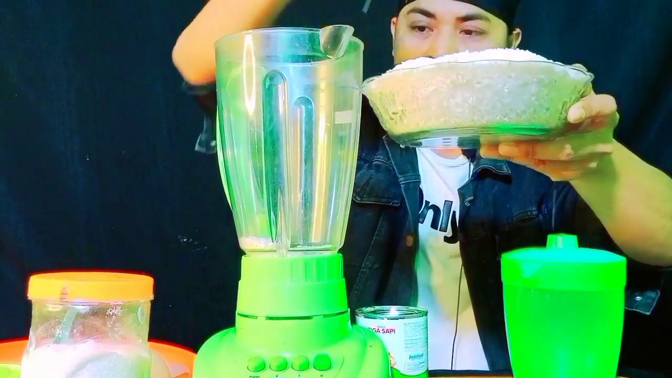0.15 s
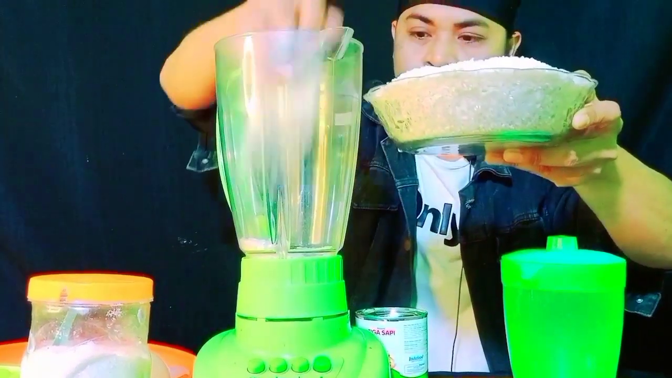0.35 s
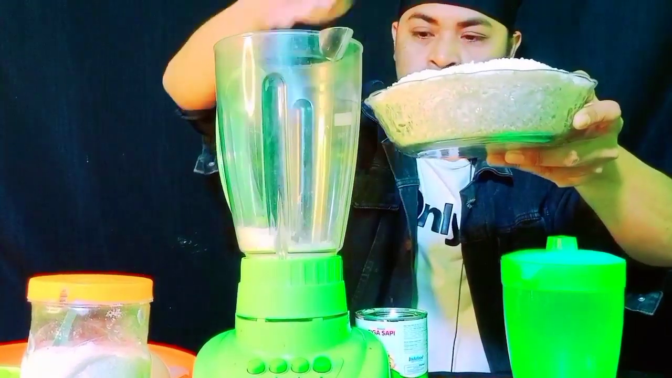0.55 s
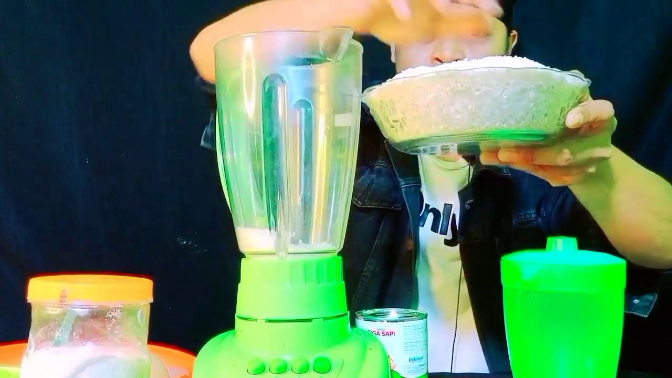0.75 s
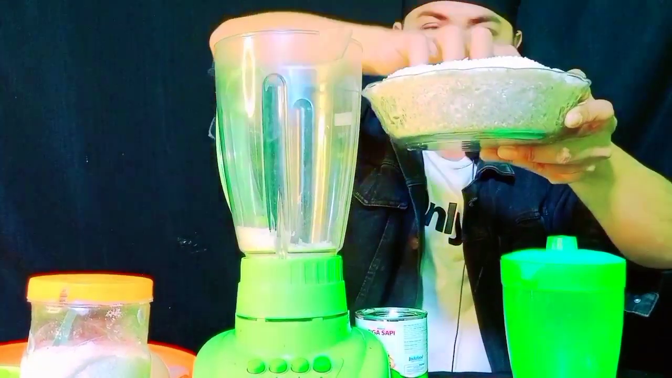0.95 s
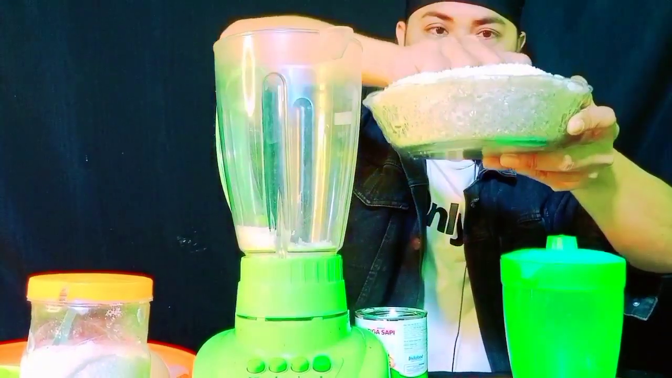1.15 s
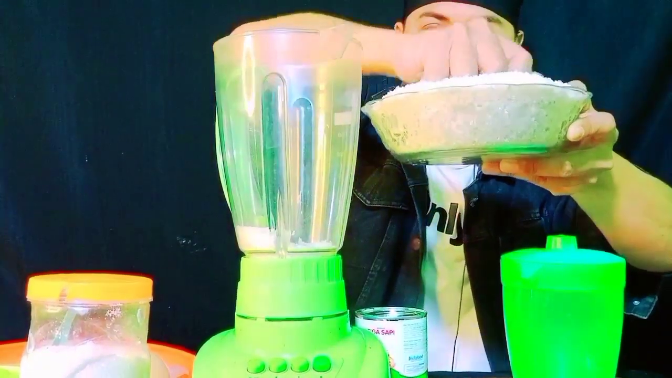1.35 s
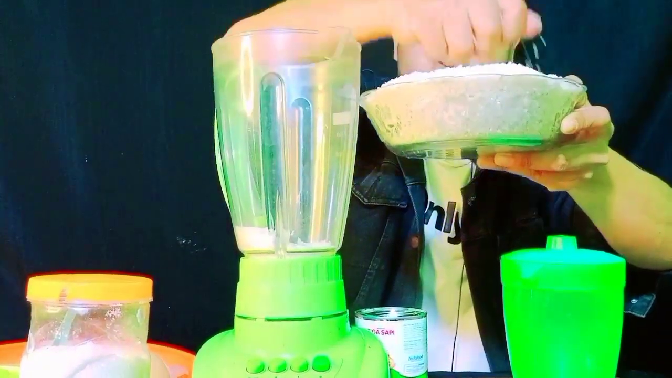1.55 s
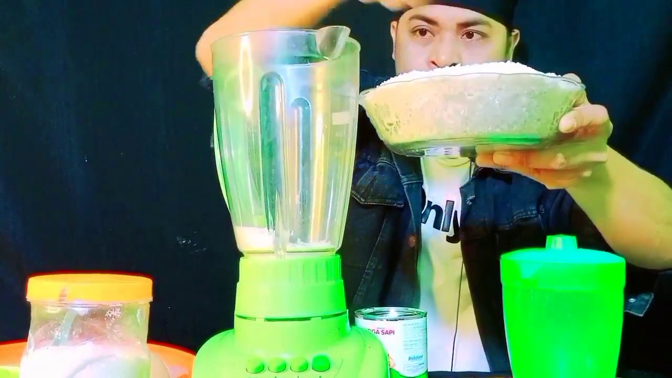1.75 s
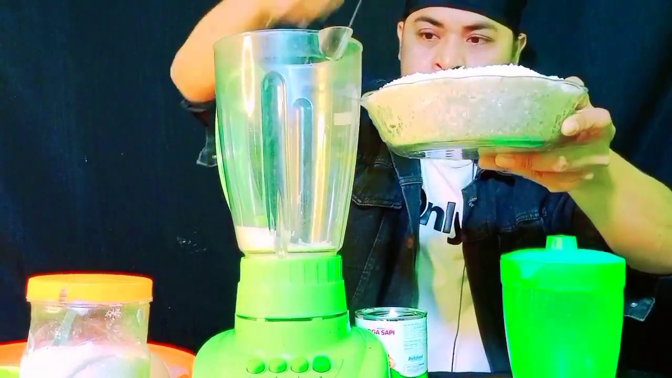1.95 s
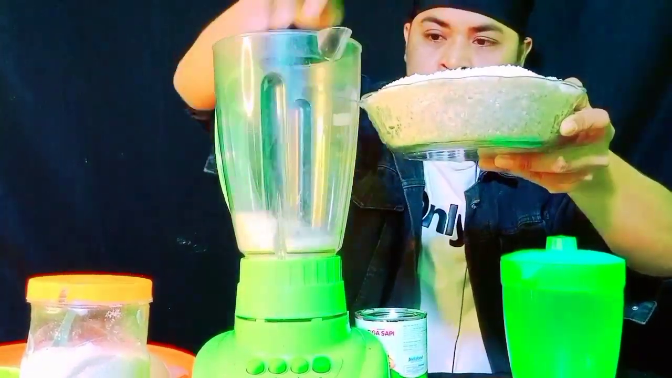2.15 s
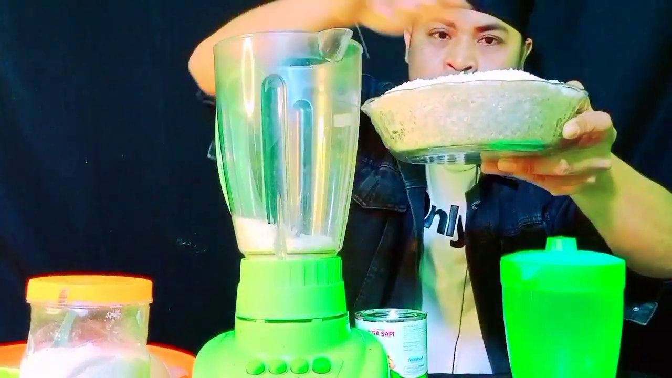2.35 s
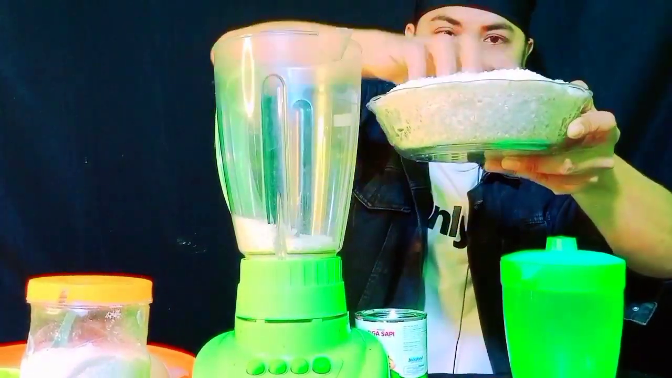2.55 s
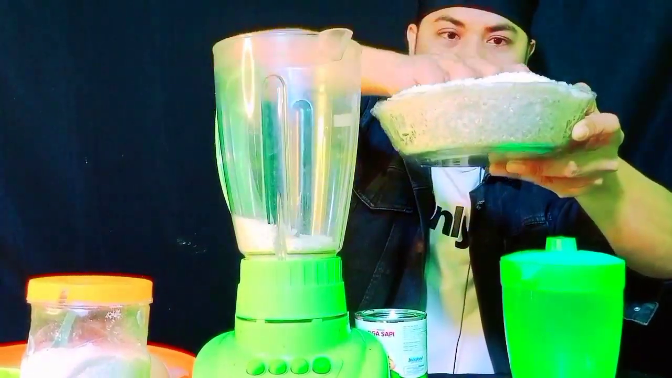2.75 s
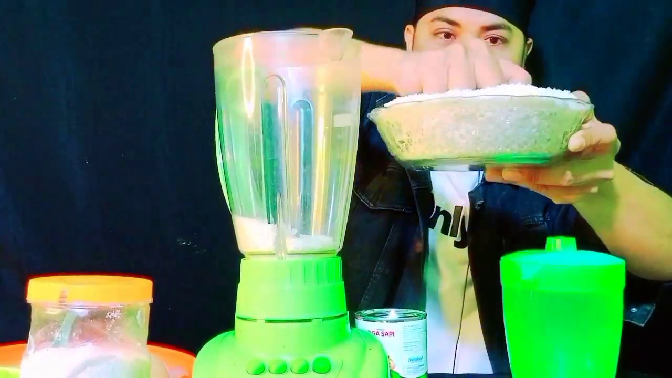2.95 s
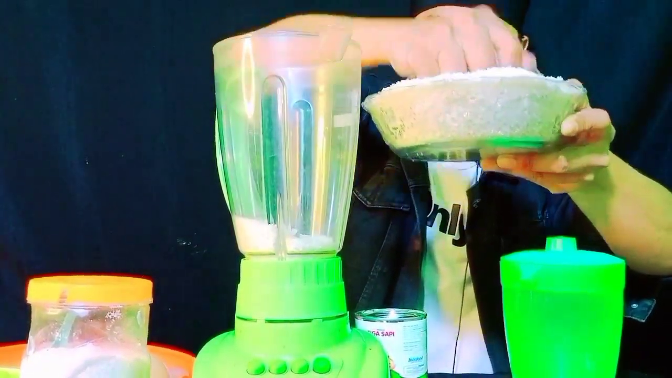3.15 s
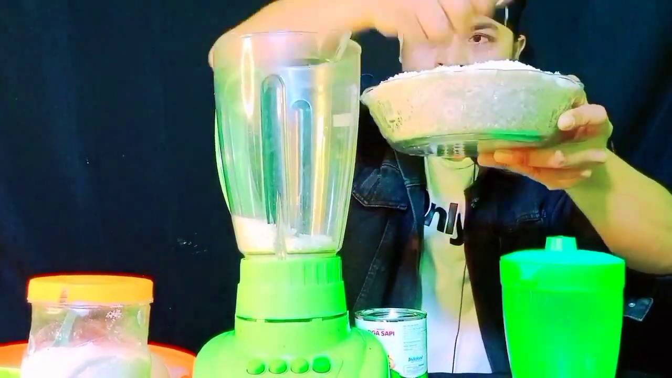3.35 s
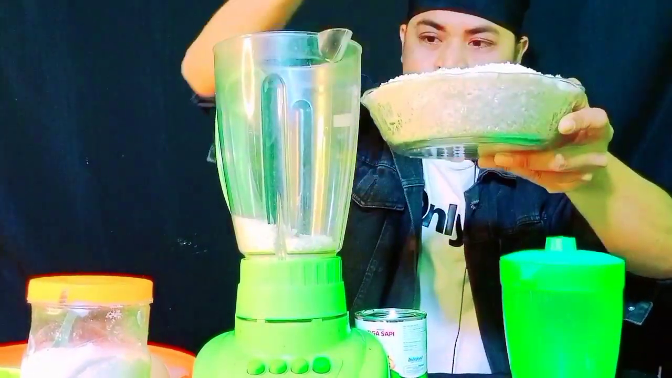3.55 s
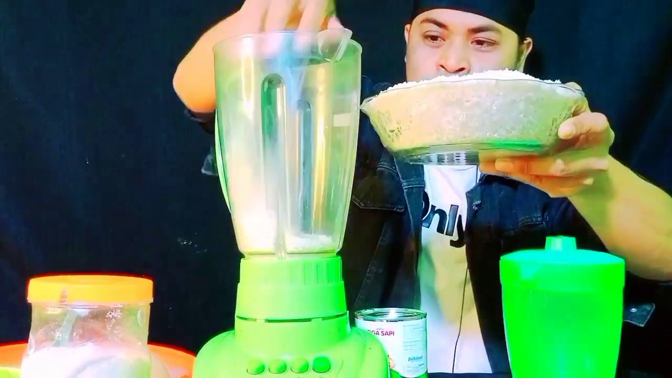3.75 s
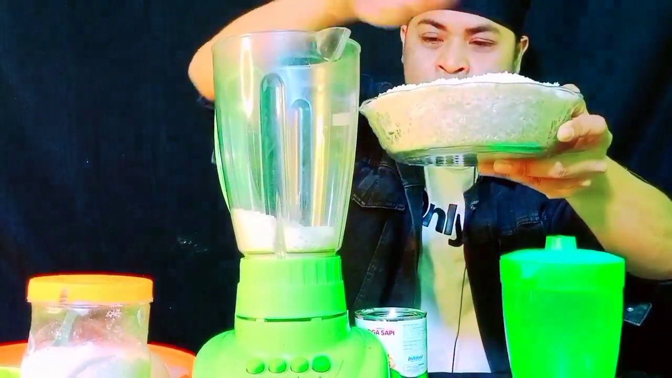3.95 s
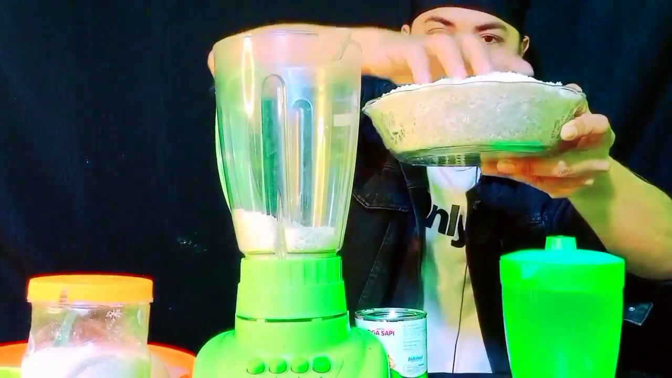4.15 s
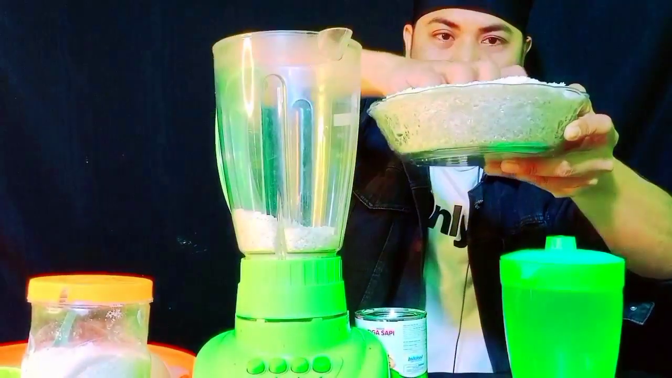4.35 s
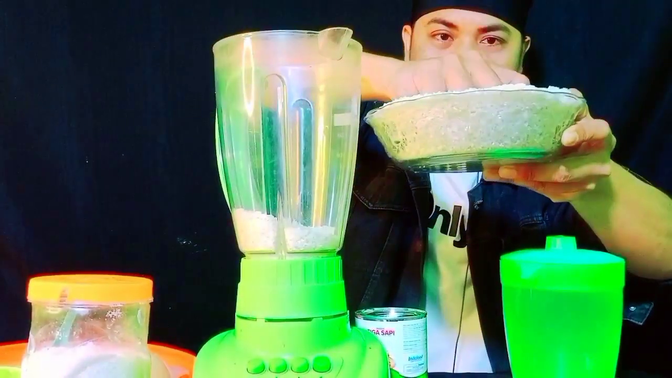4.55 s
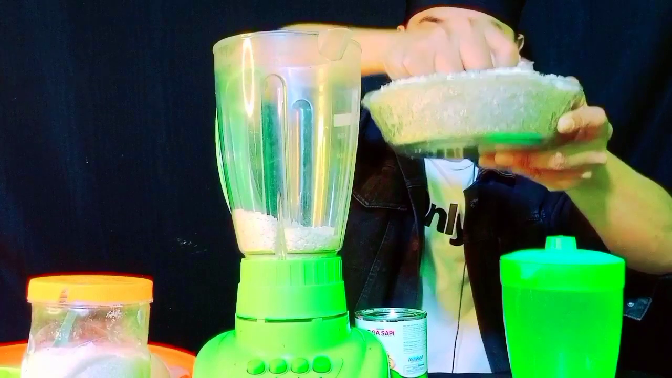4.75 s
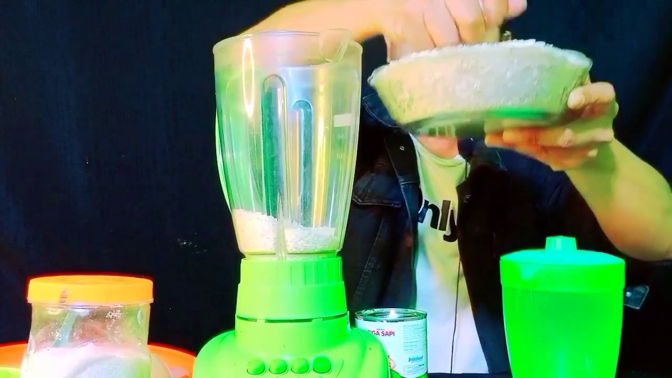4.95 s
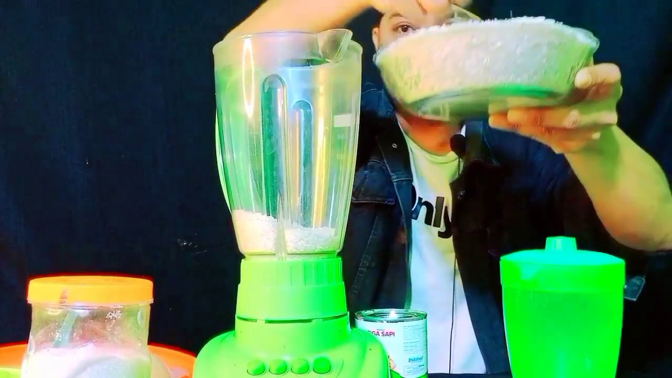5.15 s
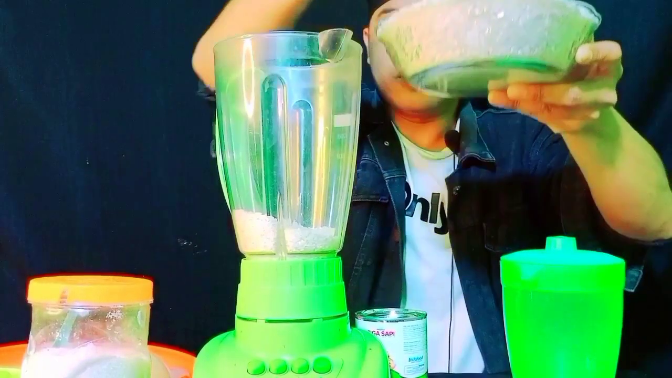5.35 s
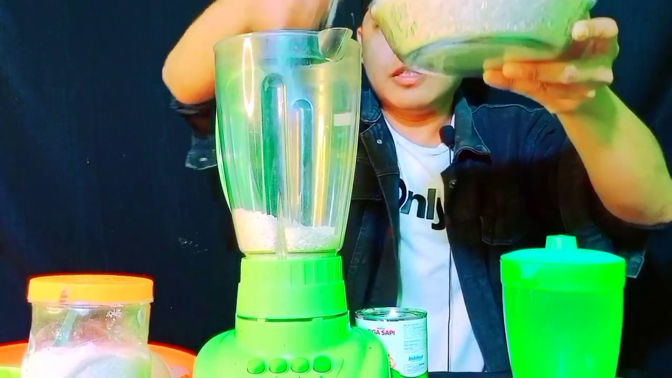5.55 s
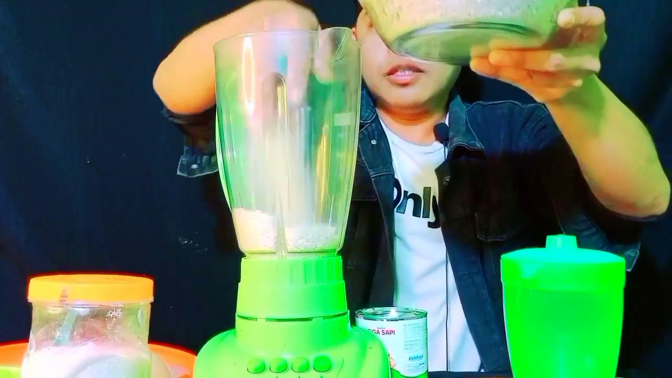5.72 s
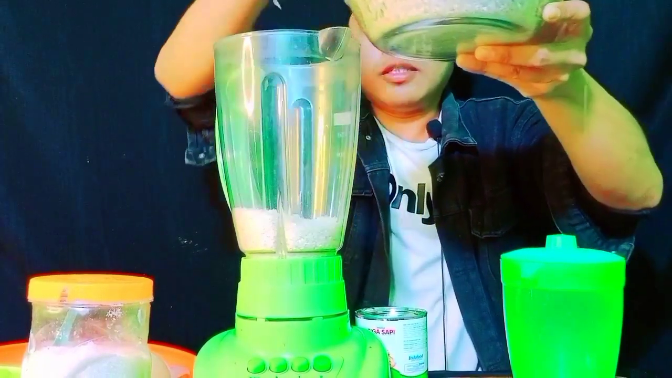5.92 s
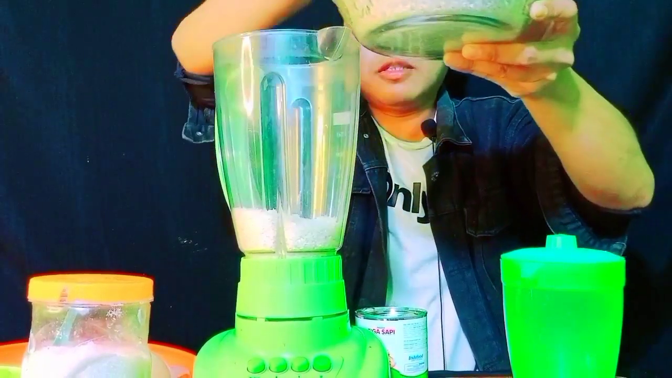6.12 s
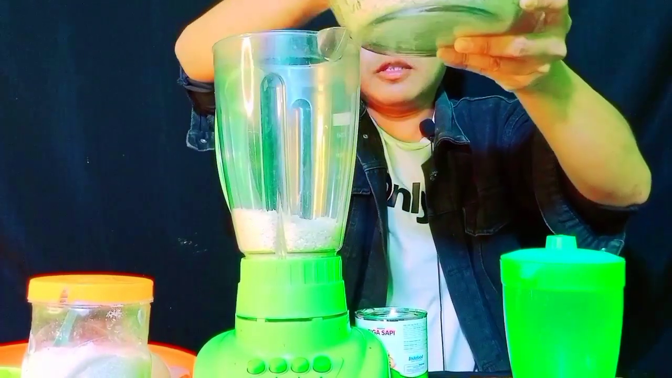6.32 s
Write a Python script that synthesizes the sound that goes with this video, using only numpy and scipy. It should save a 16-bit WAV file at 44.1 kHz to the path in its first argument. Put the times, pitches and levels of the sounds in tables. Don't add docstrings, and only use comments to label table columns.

```python
import sys
import numpy as np
from scipy import signal
from scipy.fft import rfft, irfft, next_fast_len
from scipy.io import wavfile
from scipy.ndimage import uniform_filter1d

SR = 44100
rng = np.random.default_rng(int(sys.argv[2]) if len(sys.argv) > 2 else 0)


def gain_from_decibels(decibels):
    exponent = np.asarray(decibels, float) / 20
    return 10 ** exponent


def wav_record(signal):
    frames = np.transpose(np.atleast_2d(signal))
    bounded = np.clip(frames, -1, 1)
    quanta = np.round(bounded * 32767).astype(np.int16)
    wavfile.write(sys.argv[1], SR, quanta)


N = 285889

# frequency [Hz], t60 [s].
ROOM_T60 = [(150, 0.91), (500, 0.51), (2000, 0.5), (5000, 0.52), (12000, 0.38), (15500, 0.35)]
TAIL = int(.6 * SR)

# frequency [Hz], level [dB per Hz].
HUM_SPECTRUM = [(12, -62.5), (20, -14.5), (27, -34), (48, -28), (62, -10.5), (86, -5), (107, -10),
                (164, -6.5), (258, -13.5), (292, -13), (395, -16), (1920, -27.5), (8000, -51), (10400, -90),
                (17600, -120)]
# time [s], level [dB].
TABLE_RUMBLE = [(0.0, -65), (1.44, -74), (1.59, -65), (1.88, -73), (2.201, -50), (2.508, -69), (2.89, -83.5),
                (3.61, -55), (3.7, -82), (3.831, -63), (4.24, -60), (5.289, -70.5), (5.81, -49), (6.08, -62),
                (6.26, -52), (6.48, -54)]

# time [s], half length [s], level [dB], lower and upper resonance [Hz].
RUBS = [
    (1.348, 0.077, -55, 980, 2000),
    (2.99, 0.016, -54.5, 990, 1940),
    (3.036, 0.026, -60, 1045, 1770),
    (4.373, 0.081, -68, 875, 2050),
    (4.459, 0.15, -68, 887, 2300),
    (4.561, 0.085, -77, 850, 2250),
    (4.702, 0.078, -65, 1214, 2050),
    (4.791, 0.028, -57, 1160, 1930),
    (5.051, 0.06, -70, 2050, 2150),
]

# start of full pressure [s], rise [s], hold [s], rustle [dB],
# fizz over rustle [dB].
RAKES = [(0.946, 0.11, 0.22, -63.5, -13), (1.346, 0.14, 0.027, -58.5, -12.5), (1.77, .08, 0.25, -69, -22.5),
         (2.604, 0.11, 0.37, -65.5, -12), (2.67, .02, 0.11, -62.5, -20), (2.975, 0.033, 0.0091, -59, -13),
         (3.029, 0.018, 0.007, -55.5, -10.5), (4.204, 0.059, 0.59, -65, -12),
         (4.636, 0.019, 0.082, -63, -10.5), (4.763, 0.017, 0.016, -55.5, -16),
         (5.015, 0.074, 0.076, -67.5, -24.5), (5.15, 0.045, 0.38, -75.5, -25.5)]
# frequency [Hz], level [dB per Hz].
RUSTLE_SPECTRUM = [(240, -54.5), (400, -10), (484, -4), (526, -30.5), (617, -13), (738, -2), (922, -2),
                   (1650, -6.5), (1930, -4), (2120, -6.5), (2860, -9), (5000, -32.5), (6500, -49.5),
                   (11000, -120)]
RAKE_RISE_DB, RAKE_SAG_DB_PER_S, RAKE_FADE_DB_PER_S, RAKE_UNEVEN_DB = 12, 3, 101, 1.5

# time [s], peak [dB], clack [dB], middle mode [dB], upper mode [dB].
KNOCKS = [(0.001, -23.5, -6.5, -10, -11.5), (0.332, -50, 25, -9, -15), (1.479, -24.5, -2, -5.5, 0.5),
          (1.508, -22.5, -2.5, -11.5, -3), (2.005, -31.5, 1.5, -1.5, -1.5), (2.029, -23, -2.5, -12, -7.5),
          (3.2286, -27.5, -2.5, -5.5, -1.5), (3.278, -29.5, -3, -7.5, -22), (3.575, -39, -4, -6, -14.5),
          (3.848, -29.5, -24.5, -6, -6.5), (5.69, -36, 0, -19, -3), (6.032, -20.5, -2.5, -29, -5.5),
          (6.092, -33, 1.5, -26, -18), (6.244, -22.5, -5.5, -18, -14.5)]
LEANING_KNOCKS = [
    (0.36, -56, 15, -16, -28),
    (2.153, -23.5, 6.5, -3.5, -21),
    (2.162, -18.5, -25, -12, -1),
    (3.53, -33, -7.5, -15, -5.5),
    (3.717, -34.5, 13.5, -16, -1),
    (3.8246, -13.5, -8.5, -28, -20.5),
    (3.8274, -13, 1.5, -6.5, -2.5),
    (4.203, -55.5, -28, -28, -23),
    (6.046, -29.5, -7, -20, -6),
    (6.227, -15, -10, -17.5, -15),
]
FREE_HZ, LOADED_HZ = 542.7, 533
# frequency [Hz] (last row: ratio to the knock's own pitch), level [dB], t60 [s].
BODY_MODES = [(412.8, 3, 0.32), (456, -12.5, 0.79), (0.988, 0.5, 0.52)]
# frequency [Hz], level [dB], t60 [s].
PANEL_MODES = [(753, -16.5, 0.34), (870, -20, 0.03), (1080, -21.5, 0.077), (1184, -13, 0.045),
               (1450, -22.5, 0.23), (2160, -26.5, 0.18)]
# frequency [Hz], level [dB], t60 [s].
KNUCKLE_MODES = [(1450, -10.5, 0.047), (2050, -1, 0.012), (2300, -11, 0.02)]
# frequency [Hz], level [dB per Hz].
THUD_SPECTRUM = [(35, -53.5), (60, -29), (258, -17), (414, -3.5), (476, -3), (542, 0), (610, -14.5),
                 (1000, -19.5), (1300, -59.5), (2200, -120)]
# frequency [Hz], level [dB per Hz].
CLACK_SPECTRUM = [(470, -35), (800, -13.5), (900, -10.5), (1310, -3), (1470, -5), (1670, -11), (1790, -2.5),
                  (2230, -5), (3480, -16.5), (4140, -31.5), (7000, -54.5), (9100, -91.5), (15400, -120)]
# start [s], frequency [Hz], level [dB], t60 [s].
BOOMS = [(.32, 770, -43, 1.1), (0.36, 410, -37, 0.65), (1.48, 760, -38, 0.79), (1.52, 217, -48.5, 0.97),
         (1.702, 538, -58, 2.4), (2.16, 770, -37.5, 0.54), (2.175, 266.5, -35.5, 1.5),
         (2.24, 429, -35, 0.48), (3.23, 1020, -44.5, 0.64), (3.53, 1028, -55, 0.6),
         (3.735, 185.2, -39, 0.27), (3.83, 771, -31.5, 0.81), (3.831, 1028, -28, 0.28),
         (3.832, 1459, -27, 0.34), (3.85, 177, -39.5, 0.37), (3.86, 421, -43, 0.81), (3.9, 540, -44, 1.2),
         (3.98, 370, -41.5, 0.4), (5.69, 519, -52, 0.57), (5.7, 753, -43, 0.43), (5.72, 250, -56.5, 0.81),
         (5.73, 400, -42, 0.48), (5.86, 750, -53.5, 0.51), (6.04, 930, -36, 0.24), (6.0406, 520, -25, 0.71),
         (6.07, 582, -29.5, 0.36), (6.071, 1459, -37, 0.22), (6.14, 680, -42, 0.88),
         (6.23, 790, -41.5, 0.78), (6.24, 170, -36.5, 0.35), (6.255, 337, -34.5, 0.27),
         (6.3, 590, -39, 0.34), (6.28, 538, -36, 0.65), (6.35, 450, -39, 0.31)]
BOOM_CHOKE_DB_PER_S2 = 40
# time [s], level [dB], pitch [Hz], t60 [s].
BLOWS = [(.0005, -28.5, 833.3, 0.0079), (.0745, -31, 1695, 0.018), (.27, -40, 2530, 0.014),
         (1.4795, -53, 720, 0.015), (1.508, -30, 1480, 0.02), (2.007, -36, 2050, 0.017),
         (2.155, -29, 700, .015), (3.23, -45, 870, 0.013), (3.8255, -20.5, 558, 0.021),
         (3.8265, -9.5, 2017, 0.013), (5.555, -42.5, 2510, 0.055), (6.0329, -23.5, 583, 0.021),
         (6.033, -37.5, 1290, 0.031), (6.227, -29.5, 1190, 0.028), (6.228, -23, 576, 0.026),
         (5.615, -44, 800, 0.018), (5.871, -40.5, 1040, 0.017), (4.761, -54, 1890, .04),
         (4.791, -60, 1890, .04), (3.4747, -44.5, 1840, 0.029), (1.4795, -48, 2190, .03),
         (1.4788, -31.5, 1450, 0.032), (3.2307, -40.5, 2050, 0.023), (3.282, -40, 2060, .025),
         (3.529, -50, 2050, .025), (3.557, -46.5, 2050, 0.027), (3.58, -52, 2050, .025),
         (0.3143, -33, 1690, 0.036), (.1205, -39, 4000, .012), (2.157, -22.5, 1300, 0.01),
         (5.692, -32, 1500, 0.036)]

# time [s], peak [dB], body [dB], bounce delay [ms].
TABLE_TICKS = [
    (0.27, -19.5, -2, .56),
    (0.857, -41, -7, 0.57),
    (2.7062, -35.5, -18, 0.63),
    (5.875, -27, -12, 0.54),
]
# time [s], peak [dB], body [dB], bounce delay [ms].
COMBED_TICKS = [
    (1.0018, -34.5, -5.5, .25),
    (2.8504, -41, 2.5, 0.53),
    (2.9364, -44.5, -3.5, .67),
    (3.4745, -25.5, 0, 0.5),
    (3.6904, -36.5, -6, 0.44),
    (6.4688, -13, 2, 0.77),
]
# time [s], peak [dB], body [dB], bounce delay [ms].
GRAIN_CLICKS = [
    (0.3088, -32, -30, .5),
    (1.9755, -28.5, -3, 0.46),
    (2.7662, -41, -20, .5),
    (3.6931, -29, -20, .5),
    (5.4307, -35, -9, 0.516),
    (5.4736, -29, -8, .5),
    (6.144, -38, -20, .5),
]
# time [s], peak [dB], body [dB], bounce delay [ms].
JAR_TICKS = [(0.054, -21.5, -16.5, .43), (0.0742, -14, -17.5, .58), (.0835, -32.5, -19, .5),
             (0.1205, -23.5, -3.5, .53), (0.164, -22, 1.5, .52), (0.2355, -26, -5, 0.84),
             (0.3147, -15, -12, .44), (.546, -20, -13, .5), (.64, -30, 0, 0.54),
             (0.6968, -27.5, -1.5, 0.47), (.7248, -33.5, 3, .55), (0.7821, -32.5, -1, 0.58),
             (.832, -43, -6, .5), (.914, -50, -8, 0.6), (1.2395, -46, -15, 0.47), (1.345, -50, -15, .53),
             (1.37, -56, -15.5, .5), (2.655, -51, -6.5, .53), (2.6718, -36.5, -8.5, 0.36),
             (3.019, -50, 9, 0.61), (3.698, -33, -15.5, .53), (3.702, -34.5, -16.5, .45),
             (4.6335, -49.5, -6.5, .575), (4.761, -47, 2, 0.47), (4.793, -56.5, 20.5, 0.56),
             (5.5526, -23.5, -1, 0.51), (5.6145, -28, -2, 0.58), (6.0437, -23.5, -19, 0.54),
             (6.0787, -20.5, -31, .53), (6.287, -27, -12, .45), (6.3914, -36, 3, 0.49)]
# frequency [Hz], level [dB per Hz].
GRAIN_SPECTRUM = [(2060, -25), (3500, -8), (3720, -9), (4960, -8.5), (5540, -8), (6760, -11.5),
                  (7950, -5.5), (8940, 1), (10600, -13), (12500, -15), (15400, -6.5)]
JAR_NEAR, JAR_BOUNCE, TABLE_NEAR, TABLE_BOUNCE = 1.4, 0.21, 0.47, 0.79
CLICK_NEAR, CLICK_BOUNCE, COMBED_NEAR, COMBED_BOUNCE = 0.65, 0.11, 0.79, 1
CLICK_TILT_DB = 11.5

# time [s], peak [dB], wall [dB].
LEADERS = [(.2688, -34.5, -4), (0.3352, -23, -8), (0.3735, -26, -14.5), (0.4055, -19.5, -8),
           (0.4228, -21, -8.5), (2.0035, -39, -14), (2.0165, -32, -14), (2.0273, -32.5, -11.5),
           (2.040, -33, -14.5), (2.0463, -31, -15), (2.0543, -25.5, -13.5), (2.0764, -23.5, -9),
           (2.0876, -16.5, -9), (2.1055, -16.5, -10.5), (2.1263, -22.5, -6), (3.71, -28.5, -10.5),
           (3.717, -23.5, -9), (3.7366, -15.5, -12), (3.7485, -17.5, -10.5), (3.789, -22, -10),
           (5.6147, -30, -6), (5.689, -31.5, -8), (5.733, -23.5, -7), (5.7565, -21, -4), (5.7797, -31, -1)]
LEADER_DB, LEADER_SNAP_S, LEADER_T60_S, LEADER_TAIL_DB = -7, .0022, 0.17, -9

# start of full flow [s], rise [s], hold [s], rattle [dB],
# hiss over rattle [dB].
POURS = [(0.0, 0.0085, .005, -34, 1), (0.091, 0.022, .005, -40.5, -16), (0.278, 0.057, .03, -47.5, -3),
         (0.393, 0.12, .065, -26, 0.5), (0.706, .1, .2, -61, -6), (2.099, 0.096, 0.051, -24.5, 0.5),
         (3.748, 0.064, .065, -24.5, 1), (5.562, 0.0068, .04, -46.5, 0), (5.627, 0.025, .07, -47, -3),
         (5.697, 0.027, .02, -34, -11), (5.747, 0.19, 0.044, -31, 0), (6.06, 0.028, .12, -47, -3.5),
         (6.302, 0.018, .08, -59.5, -5)]
# frequency [Hz], width [Hz], level [dB].
JAR_WALLS = [(1171, 20, 7.5), (1454, 84, 3.5), (2270, 16, -9.5), (2460, 33, -9), (3106, 23, 0.5)]
# frequency [Hz], level [dB per Hz].
RATTLE_SPECTRUM = [(210, -50), (350, -20), (411, -3), (451, -27.5), (524, -6.5), (595, -22.5), (758, -2),
                   (1020, -14), (1170, -4.5), (1290, -8.5), (1440, -5), (1820, -2.5), (2430, 0.5),
                   (3400, -6.5), (5500, -22.5), (7150, -44), (12100, -120)]
# frequency [Hz], level [dB per Hz].
TREBLE_SPECTRUM = [(2060, -15), (3500, -1.5), (4060, -10.5), (4430, -7), (4990, -10), (6390, -9.5),
                   (7610, -6), (8780, 6), (9280, 1), (9880, -6.5), (11300, -4.5), (12000, -11),
                   (14900, -0.5), (15400, 0.5)]
POUR_RISE_DB, POUR_SAG_DB_PER_S = 29, 23.5
RATTLE_FADE_DB_PER_S, HISS_FADE_DB_PER_S = 129.5, 167
HISS_RISE_DB, DRY_DB = 26.5, -8.5


def unit(x):
    return x / np.sqrt(np.mean(x ** 2) + 1e-20)


def along(points, hz):
    f, v = np.transpose(points)
    return np.interp(np.log(hz + 1), np.log(f + 1), v)


def filtered(x, response):
    m = next_fast_len(len(x) + 4096)
    return irfft(rfft(x, m) * response(np.fft.rfftfreq(m, 1 / SR)), m)[:len(x)]


def coloured(x, spectrum):
    return unit(filtered(x, lambda hz: gain_from_decibels(along(spectrum, hz))))


def dying(x):
    hz, t, z = signal.stft(x, SR, nperseg=256)
    fading = z * gain_from_decibels(-60 * t / along(ROOM_T60, hz)[:, None])
    return signal.istft(fading, SR, nperseg=256)[1][:len(x)]


def add(track, s, sound):
    track[round(s * SR):][:len(sound)] += sound


def impacts(per_second, spread_db):
    chance = rng.random(N)
    sign = rng.standard_normal(N)
    size = np.minimum(rng.exponential(1, N), 3.5)
    return (chance < per_second / SR) * sign * gain_from_decibels(spread_db * size)


def swells(rows, rise_db, sag, fade):
    s, rise, hold, db = np.transpose(rows)[:4, :, None]
    lag = np.arange(0, N + 64, 64) / SR - s
    early, late = np.maximum(-lag / rise, 0), np.maximum(lag - hold, 0)
    return db - rise_db * (early ** 1.25 + early ** 9) - sag * np.clip(lag, 0, hold) - fade * late


def loudest(levels_db):
    top_db = np.maximum(levels_db.max(axis=0), -200)
    return gain_from_decibels(np.interp(np.arange(N), 64 * np.arange(len(top_db)), top_db))


def in_room(x, direct_db):
    out, t, size = np.zeros(N + 2 * TAIL), np.arange(TAIL) / SR, 4400
    burst = 1 + gain_from_decibels(direct_db) * np.exp(-(t / 0.003) ** 2)
    for start in range(0, N, size):
        piece = x[start:start + size]
        if np.abs(piece).max() > 1e-4:
            tail = dying(rng.standard_normal(TAIL)) * burst
            add(out, start / SR, signal.fftconvolve(piece, tail / np.linalg.norm(tail)))
    return out[:N]


def supply(level, t60, least):
    power = uniform_filter1d(level ** 2, 221, origin=110)
    stored = np.gradient(power) * SR * t60 / (6 * np.log(10))
    return np.sqrt(np.maximum(power + stored, least * np.abs(power)))


def ring(modes, t):
    hz, db, t60 = np.transpose(modes)[..., None]
    beat, pace = rng.random((2, len(modes), 1))
    flutter = 1 + 0.079 * np.sin(2 * np.pi * (beat + (7.2 + 9 * pace) * t))
    quick = np.sin(2 * np.pi * (pace + (17 + 22 * beat) * t))
    flutter = flutter + 0.12 * quick * (1 - np.exp(-t / 0.051))
    sway = 0.22 * np.sin(2 * np.pi * (pace - beat + (8 + 14 * beat) * t))
    return gain_from_decibels(db - 60 * t / t60) * flutter * np.sin(2 * np.pi * hz * t + sway)


def hum():
    floor = gain_from_decibels(-63) * coloured(rng.standard_normal(N), HUM_SPECTRUM)
    s, db = np.transpose(TABLE_RUMBLE)
    low = filtered(rng.standard_normal(N), lambda hz: np.exp(-((hz - 78) / 30) ** 2))
    rumble = gain_from_decibels(np.interp(np.arange(N) / SR, s, db) - 10.0) * unit(low)
    hiss = gain_from_decibels(-85) * coloured(rng.standard_normal(N), TREBLE_SPECTRUM)
    rising_hiss = gain_from_decibels(-89.5) * unit(np.diff(rng.standard_normal(N + 2), 2))
    return floor + rumble + hiss + rising_hiss


def rubs():
    out, t = np.zeros(N), np.arange(N) / SR
    for s, half, db, low_hz, high_hz in RUBS:
        bowl = lambda f: np.exp(-((f - low_hz) / 150) ** 2) + 0.87 * np.exp(-((f - high_hz) / 220) ** 2)
        near = slice(int((s - 3 * half) * SR), int((s + 3 * half + .1) * SR))
        lag = (t[near] - s) / half
        after = (lag > 0) * (1 - np.exp(-lag ** 2)) * gain_from_decibels(-110 * lag * half)
        stroke = np.exp(-lag ** 2) + 0.24 * after
        grip = gain_from_decibels(1.4 * unit(uniform_filter1d(rng.standard_normal(len(lag)), size=500)))
        out[near] += gain_from_decibels(db) * grip * stroke * unit(filtered(rng.standard_normal(len(lag)), bowl))
    return out


def raking():
    pressure_db = swells(RAKES, RAKE_RISE_DB, RAKE_SAG_DB_PER_S, RAKE_FADE_DB_PER_S)
    uneven = gain_from_decibels(RAKE_UNEVEN_DB * unit(uniform_filter1d(rng.standard_normal(N), size=1500)))
    rustle = uneven * loudest(pressure_db)
    fizz = uneven * loudest(pressure_db + np.array(RAKES)[:, -1:])
    grains = impacts(1800, spread_db=1.0) + 0.91 * rng.standard_normal(N)
    return rustle * coloured(grains, RUSTLE_SPECTRUM) + fizz * coloured(grains, TREBLE_SPECTRUM)


def booms():
    out, t = np.zeros(N + TAIL), np.arange(TAIL) / SR
    shape = (1 - np.exp(-t / 0.018)) * gain_from_decibels(-BOOM_CHOKE_DB_PER_S2 * t ** 2)
    for s, *mode in BOOMS:
        add(out, s, shape * ring([mode], t)[0])
    return out[:N]


def knocks():
    out, t = np.zeros(N + TAIL), np.arange(TAIL) / SR
    shape = (1 - np.exp(-t / 0.00093)) * (1 + 0.32 * np.exp(-(t / 0.0029) ** 2))
    rows = [(*k, FREE_HZ) for k in KNOCKS] + [(*k, LOADED_HZ) for k in LEANING_KNOCKS]
    for s, db, clack_db, middle_db, upper_db, upper_hz in rows:
        strengths = gain_from_decibels(np.array([[middle_db], [middle_db], [upper_db]]))
        modes = np.multiply(BODY_MODES, [[1, 1, 1], [1, 1, 1], [upper_hz, 1, 1]])
        body = strengths * ring(modes, t)
        panel_db = .5 * clack_db + rng.standard_normal((len(PANEL_MODES), 1))
        panel = gain_from_decibels(panel_db) * ring(PANEL_MODES, t)
        rings = (body.sum(axis=0) + panel.sum(axis=0)) * (1 - np.exp(-t / 0.0058))
        knuckle = ring(KNUCKLE_MODES, t).sum(axis=0) * (1 - np.exp(-t / .001))
        rings = rings + gain_from_decibels(clack_db + 0.5) * knuckle
        air = rng.standard_normal(TAIL)
        noise = gain_from_decibels(-11.5) * coloured(air, THUD_SPECTRUM)
        noise = noise + gain_from_decibels(clack_db - 11.0) * coloured(air, CLACK_SPECTRUM)
        noise = noise + gain_from_decibels(clack_db - 37.5) * coloured(air, TREBLE_SPECTRUM)
        add(out, max(s - .002, 0), gain_from_decibels(db - 3.0) * (rings + shape * dying(noise)))
    return out[:N]


def blows():
    out, t = np.zeros(N + TAIL), np.arange(TAIL // 8) / SR
    for s, db, pitch_hz, t60 in BLOWS:
        around_pitch = lambda hz: np.exp(-(np.log((hz + 1) / pitch_hz) / 0.44) ** 2)
        grit = filtered(rng.standard_normal(len(t)), around_pitch)
        swing = np.sin(2 * np.pi * pitch_hz * t) + 0.7 * unit(grit)
        add(out, s, gain_from_decibels(db + 7.5 - 60 * t / t60) * (1 - np.exp(-t / 0.0025)) * swing)
    return out[:N]


def ticks():
    out, t = np.zeros(N + TAIL), np.arange(TAIL) / SR
    burst = 2.0 * np.exp(-(t / .0016) ** 2) + 0.44 * np.exp(-(t / 0.0073) ** 4)
    kinds = [(JAR_TICKS, JAR_NEAR, JAR_BOUNCE, 1.5),
             (TABLE_TICKS, TABLE_NEAR, TABLE_BOUNCE, .3),
             (GRAIN_CLICKS, CLICK_NEAR, CLICK_BOUNCE, CLICK_TILT_DB),
             (COMBED_TICKS, COMBED_NEAR, COMBED_BOUNCE, .3)]
    for rows, near, bounce, tilt_db in kinds:
        shape = (1 - np.exp(-t / .0003)) * (1 + near * burst)
        tilted = [(hz, level + tilt_db * np.log2(hz / 9000)) for hz, level in GRAIN_SPECTRUM]
        for s, db, body_db, bounce_ms in rows:
            comb = lambda hz: 1 + min(bounce, .95) * np.exp(-2j * np.pi * hz * bounce_ms / 1000)
            air = filtered(rng.standard_normal(TAIL), comb)
            sound = coloured(air, tilted) + gain_from_decibels(body_db - 2.5) * coloured(air, RATTLE_SPECTRUM)
            add(out, s - .0004, gain_from_decibels(db - 25.5) * shape * dying(sound))
    return out[:N]


def leaders():
    out, t = np.zeros(N + TAIL), np.arange(TAIL // 6) / SR
    shape = np.exp(-(t / LEADER_SNAP_S) ** 2) + gain_from_decibels(LEADER_TAIL_DB - 60 * t / LEADER_T60_S)
    for s, db, wall_db in LEADERS:
        air = rng.standard_normal(len(t))
        snap = coloured(air, TREBLE_SPECTRUM) + gain_from_decibels(wall_db) * coloured(air, RATTLE_SPECTRUM)
        add(out, s - .0003, gain_from_decibels(db + LEADER_DB) * shape * snap)
    return out[:N]


def jar_response(f):
    return 1 + sum(gain_from_decibels(db) * 1j * f * w / (c * c - f * f + 1j * f * w) for c, w, db in JAR_WALLS)


def pours():
    rattle = loudest(swells(POURS, POUR_RISE_DB, POUR_SAG_DB_PER_S, RATTLE_FADE_DB_PER_S))
    hiss_db = swells(POURS, HISS_RISE_DB, POUR_SAG_DB_PER_S, HISS_FADE_DB_PER_S)
    hiss = loudest(hiss_db + np.array(POURS)[:, -1:])
    drum = coloured(filtered(impacts(7000, spread_db=1.5), jar_response), RATTLE_SPECTRUM)
    deep = filtered(drum, lambda hz: 1 / (1 + (hz / 1150) ** 8))
    filling = np.interp(np.arange(N) / SR, [.4, 2.1, 3.8, 5.7], [.05, 0.3, .35, 0.6])
    drum = (drum - filling * deep) * supply(rattle, t60=0.39, least=0.027)
    fizz = coloured(impacts(5000, spread_db=2.0), TREBLE_SPECTRUM) * supply(hiss, t60=0.32, least=.08)
    return gain_from_decibels(DRY_DB) * (drum + fizz) + in_room(drum + fizz, direct_db=8.5)


def scene():
    handling = rubs() + raking() + booms() + knocks() + blows()
    rice = ticks() + leaders() + pours()
    return (hum() + handling + rice)[None]


def roll_off(x):
    return signal.sosfilt(signal.butter(12, 16680, fs=SR, output="sos"), x)


def record(dry):
    def channel(hz):
        no_bass = hz ** 4 / (hz ** 4 + 36 ** 4)
        return no_bass * (gain_from_decibels(-42.5) + 1 / (1 + (hz / 15670) ** 600))

    mix = filtered(dry[0], channel)[None]
    return roll_off(mix)


dry = scene()
out = record(dry)
wav_record(out)
```